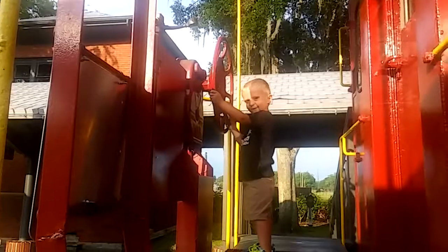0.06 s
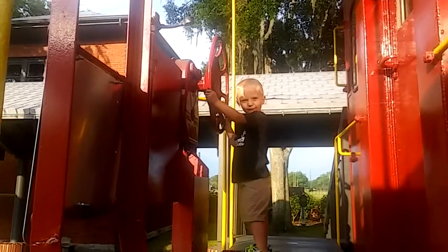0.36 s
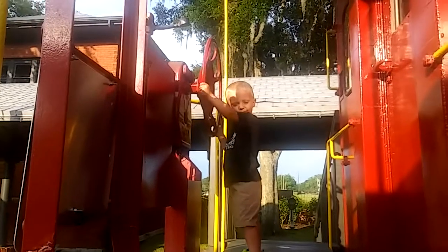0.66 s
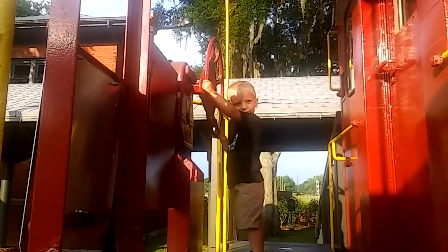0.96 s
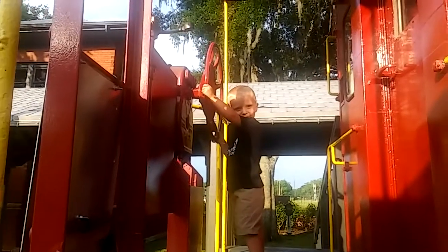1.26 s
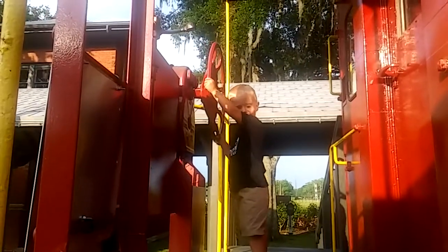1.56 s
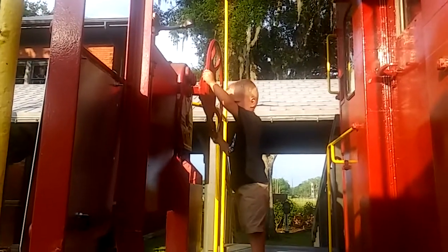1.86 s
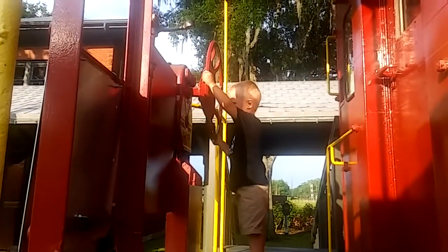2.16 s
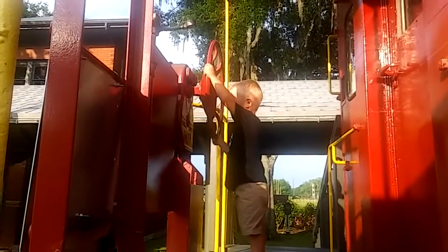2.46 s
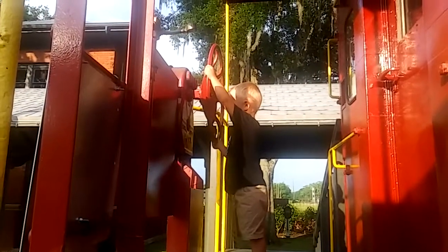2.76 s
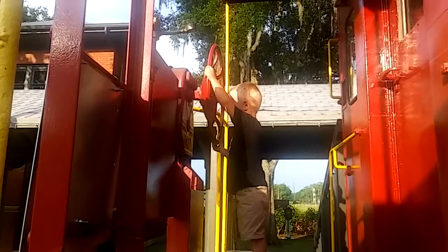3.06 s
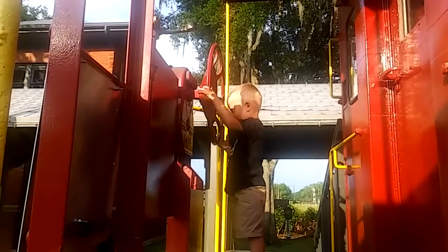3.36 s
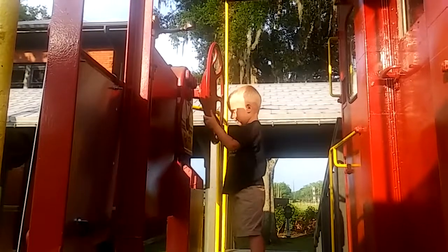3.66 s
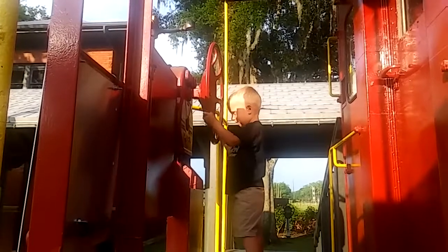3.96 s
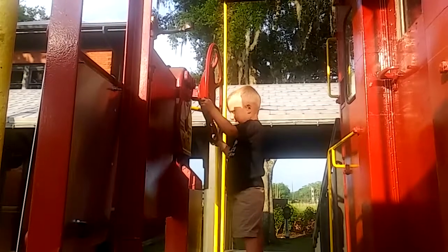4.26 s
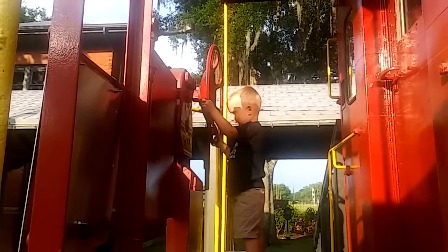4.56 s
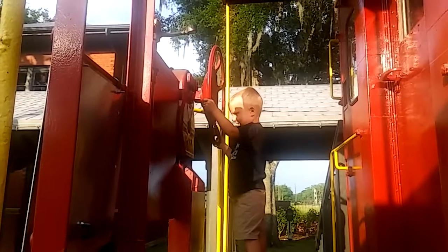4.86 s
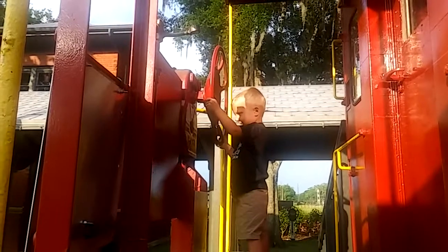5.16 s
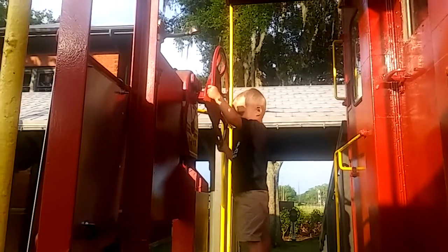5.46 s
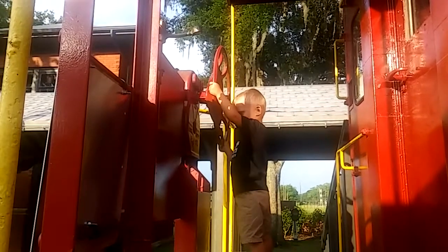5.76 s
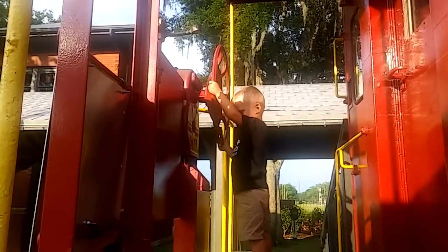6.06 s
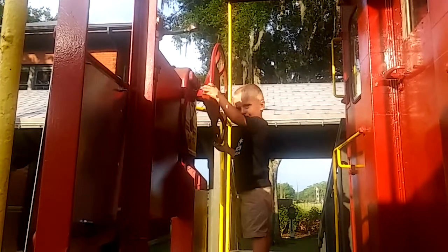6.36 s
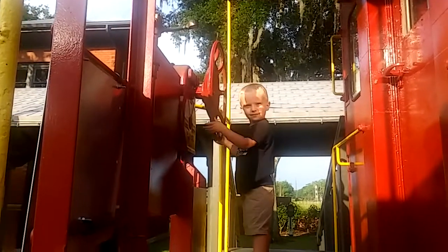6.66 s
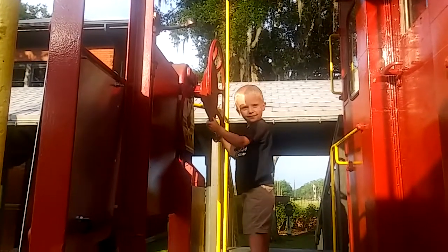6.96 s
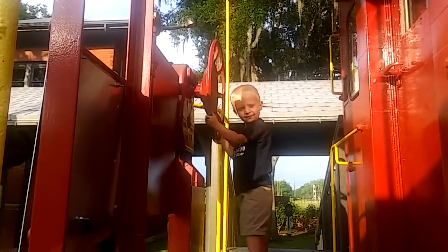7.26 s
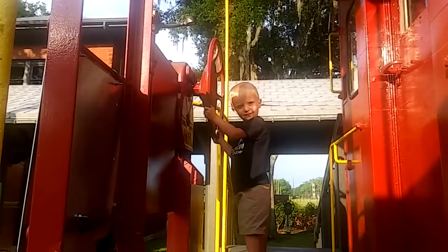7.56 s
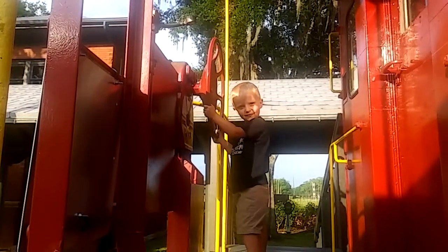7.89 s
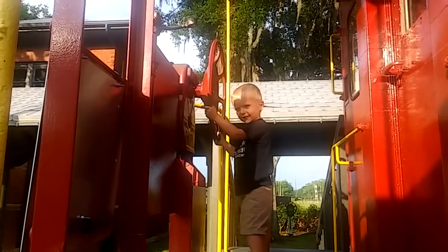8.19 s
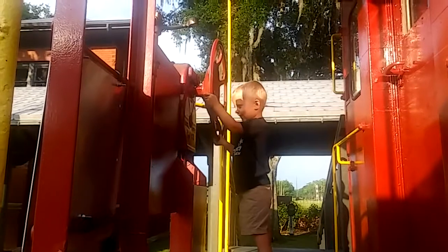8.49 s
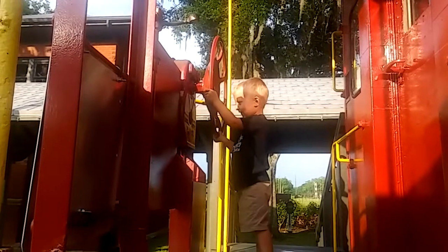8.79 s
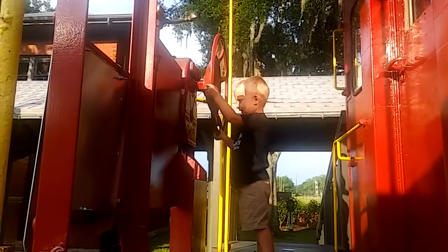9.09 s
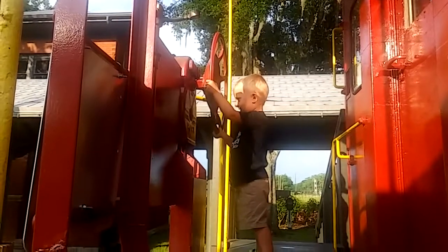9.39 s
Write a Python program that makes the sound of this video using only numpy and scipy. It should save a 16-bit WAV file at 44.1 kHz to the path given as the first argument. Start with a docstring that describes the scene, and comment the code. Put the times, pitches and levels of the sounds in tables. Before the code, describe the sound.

After half a second of silence, a faint outdoor breeze comes in and an iron hand brake wheel on a railcar is slowly cranked nearby. Its ratchet drops with sharp, bright clanks that ring briefly through the steel body, at about 0.8, 1.7 and 2.6 seconds, with light ticks, faint creaks and dry rubbing between them. After a pause, two quick clanks land at 4.2 and 4.3 seconds with a short, piercing squeal between them. A weaker squeal leads into another pair at 5.5 and 5.8 seconds. Soft, dull bumps come from about 5.6 to 8.3 seconds. A faint creak precedes a single clank at 7.5 seconds, and a last pair follows at 8.5 and 8.7 seconds. The clanks are all about equally loud and stand far above the breeze, which continues to the end at around 9.5 seconds.

```python
"""The iron hand brake wheel of a caboose, cranked slowly by a child on the open end platform.
The pawl ticks along the ratchet and drops off the teeth, clanking through the gear case and the steel
car body. The dry shaft rubs and creaks, and the wheel squeals as the iron sticks and slips.
Underneath sit soft knocks, dull bumps, faint whines and a thin buzz, on a bed of light breeze
and outdoor hush."""
import sys
import numpy as np
from scipy import signal
from scipy.fft import rfft, irfft
from scipy.io import wavfile
from scipy.ndimage import uniform_filter1d, map_coordinates

SR = 44100
rng = np.random.default_rng(int(sys.argv[2]) if len(sys.argv) > 2 else 0)


def put_to_file(sound):
    """Save the sound as 16-bit audio at rate SR, in the file named by the first command-line argument."""
    columns = np.atleast_2d(sound).T  # one column per channel
    safe = np.clip(columns, -1, 1)
    whole_steps = np.round(safe * 32767)
    wavfile.write(sys.argv[1], SR, whole_steps.astype(np.int16))


N = 420273
TIME = np.arange(N) / SR
RING_TIME = TIME[:int(1.3 * SR)]

# rise and fall of the breeze: (time [s], level [dB])
BREEZE_LEVEL = [(0.6, -49.5), (1.4, -59.5), (3.3, -64.5), (5.2, -59.5), (5.7, -57), (7.2, -52), (8.2, -47),
                (9.15, -59.5), (9.5, -50)]
# low rumble of the breeze: (frequency [Hz], relative density [dB])
BREEZE_COLOUR = [(15, -48), (25, -22.5), (62, -5), (92, -0.5), (151, 1), (273, -10.5), (300, -17.5),
                 (390, -44), (660, -120)]
# distant hush: (frequency [Hz], relative density [dB])
HUSH_COLOUR = [(200, -3), (420, -9.5), (850, -7.5), (1300, -16.5), (2100, -20.5), (2900, -25)]
# rise and fall of the high hiss: (time [s], level [dB])
HISS_LEVEL = [(.5, -69), (2.2, -66), (4.55, -67), (4.95, -75), (5.4, -77.5), (6.4, -64.5), (8.8, -67.5),
              (9.53, -71)]
# high hiss: (frequency [Hz], relative density [dB])
HISS_COLOUR = [(1470, -40), (2500, -7), (2910, -10), (4470, -9), (4750, -5), (5160, -14), (7510, -2),
               (9730, -10), (15500, -5.5)]
# spells of dry rubbing as the wheel turns: (start [s], length [s], level [dB])
RUBS = [(.2, 1.52, -57.5), (2.348, 1.05, -62), (5.56, .17, -39), (8.126, 0.42, -59), (8.704, 0.95, -66)]
# rasp of rusty iron: (frequency [Hz], relative density [dB])
RUB_COLOUR = [(1000, -18.5), (2200, 1.5), (3200, -8.5), (4400, -0.5), (5800, -6), (7800, 1.5), (10000, -13),
              (12500, -5.5), (15500, -16)]
# faint, nearly pure tones: (start [s], length [s], pitch [Hz], level [dB], glide [octaves/s])
WHINES = [(0.297, 1.33, 100, -55.5, 0.037), (1.486, 0.15, 392, -53.5, 0.22),
          (2.385, .12, 1516, -58.5, 0.011), (2.59, 0.18, 942, -39, -0.066), (4.4, 0.6, 774, -51, 0.2),
          (4.972, .22, 385, -56, -0.17), (7.431, 0.15, 1436, -45.5, -0.95),
          (8.33, 0.36, 162.5, -49, -0.099), (9.33, 0.34, 169.5, -49, 0.24)]
# partials of a whine: {multiple of the pitch: level [dB]}
WHINE_PARTIALS = {1: 0, 2: -16.5}
# creaks of the shaft: (start [s], length [s], pitch [Hz], level [dB], brightness [dB/octave])
CREAKS = [(.624, .205, 913.7, -43.5, 6), (7.312, 0.16, 904.6, -43, -8.5)]
# partials of a creak: {multiple of the pitch: level [dB]}
CREAK_PARTIALS = {1: 0, 2: 0, 3: -15.5, 4: -24.5, 5: -35}
# spells of thin buzz: (start [s], end [s])
BUZZES = [(.66, 0.98), (3.54, 3.63), (6.3, 7.52)]
# partials of the buzz: {multiple of the pitch: level [dB]}
BUZZ_PARTIALS = {2: -70.5, 3: -75.5, 4: -77, 5: -80.5, 9: -82.5, 11: -76, 13: -68, 14: -71, 15: -67}
# the pawl riding the teeth: (time [s], level [dB])
TICKS = [(0.756, -40), (0.7766, -37.5), (1.1482, -44), (1.283, -37), (1.4239, -39.5), (2.4298, -37.5),
         (2.8984, -38), (3.2944, -48), (3.7986, -52.5), (3.962, -41), (4.028, -40.5)]
# bright ring of a tick: (frequency [Hz], density [dB], t60 [s])
TICK_RING = [(295.8, -49, 0.16), (1520, -49.5, 0.21), (3072, -57.5, 0.084), (4960, -54.5, .08),
             (7760, -46, 0.071), (15000, -67.5, .07)]
# pawl drops: (time [s], force [dB], brightness [dB/octave], car body [dB], bark [dB], panel modes [dB])
CLANKS = [(.836, -1.5, 0, 3, 1, 2.5), (1.735, -2, 1, 2, 0, -1.5), (2.566, -0.5, 0, 1, -1, -6),
          (4.176, -1, 0.5, 1, 1.5, -2), (4.327, -1.5, 0.5, 3.5, -2, 0), (5.481, -1, 1, 3.5, 1.5, 5),
          (5.775, -1, 1, 0.5, -6.5, 4), (7.515, -1, 0.5, 2, 0.5, 1), (8.479, -1.5, 1, 3, 1, 2),
          (8.736, -1.5, 0.5, 3.5, -2.5, -3.5)]
# strong modes of wheel, ratchet and case: {frequency [Hz]: (level [dB], t60 [s])}
IRON_MODES = {309: (-37, .7), 368: (-31, 1.0), 444: (-37, .7), 589: (-36, .6), 826: (-33, .6),
              888: (-33, .6), 960: (-32, .6), 1087: (-32, .55), 1257: (-26, .55), 1448: (-27, .45),
              1717: (-21, .36), 1763: (-24, .3), 1839: (-21, .26), 2058: (-20, .28), 2191: (-19, .28),
              2251: (-24, .38), 2434: (-22, .36), 2632: (-25, .33), 2726: (-24, .36), 3184: (-24, .28),
              3657: (-21, .24), 3760: (-20, .2), 3827: (-17, .22), 4123: (-20, .24), 4259: (-21, .22),
              5016: (-23, .28), 5663: (-23, .19), 6971: (-22, .26), 9956: (-34, .26), 13576: (-38, .24)}
# crowd of weaker modes in the gear case: (frequency [Hz], density [dB], t60 [s])
CASE_RING = [(40, -81, .3), (300, -70.5, .35), (660, -54.5, 0.27), (1417, -47.5, 0.48), (1990, -39.5, 0.29),
             (3010, -47, .25), (3850, -40.5, .25), (5120, -43.5, 0.14), (5230, -49.5, .22),
             (7143, -41.5, 0.16), (8740, -51.5, 0.15), (12300, -59, .2), (13600, -57.5, .19),
             (15500, -64.5, 0.13)]
# the pawl's own short bark: (frequency [Hz], level [dB], t60 [s])
PAWL_MODES = [(1813, -9, 0.025), (2066, -7, .04), (6874, -12, 0.12)]
# long tail of the car body and platform roof: (frequency [Hz], density [dB], t60 [s])
BODY_RING = [(50, -79.5, 1.2), (125, -69, 1.3), (334, -59, 0.87), (720, -60.5, 1), (1100, -60.5, 0.65),
             (2280, -62, .7), (3100, -68, 0.23), (4030, -66, 0.6), (7400, -64, 0.41), (10000, -75, 0.45),
             (15500, -91, 0.49)]
# play in the gearing: (time [s], level [dB])
KNOCKS = [(1.283, -62), (2.428, -51.5), (2.896, -40.5), (3.27, -53.5), (6.262, -55)]
# soft ring of a knock: (frequency [Hz], density [dB], t60 [s])
KNOCK_RING = [(151.1, -40, 0.19), (450, -28.5, 0.064), (1000, -34, .17), (2196, -44.5, 0.1),
              (4000, -52, .1), (12000, -79, .1)]
# high squeals of the wheel: (start [s], length [s], level [dB])
SQUEALS = [(1.598, 0.12, -52), (2.462, 0.071, -47), (4.241, 0.07, -12.5), (5.348, .14, -24.5),
           (8.386, 0.064, -57.5)]
# harmonics of a squeal and a neighbouring wheel mode: {multiple of the pitch: level [dB]}
SQUEAL_PARTIALS = {1: 0, 1.076: -13.5, 2: -22.5, 3: -41.5}
# faint puffs of noise just before some clanks: (start [s], length [s], level [dB])
LEAD_INS = [(2.549, 0.018, -39.5), (5.464, .018, -40.5), (5.755, 0.019, -42.5), (7.497, 0.0221, -45),
            (8.464, .016, -43)]
# dull colour of a puff: (frequency [Hz], relative density [dB])
LEAD_IN_COLOUR = [(1000, -1), (2000, -3.5), (3000, -10.5), (5000, -22)]
# dull bumps: (time [s], level [dB])
BUMPS = [(3.864, -41), (5.629, -30), (5.902, -28.5), (6.043, -36), (6.264, -23), (6.437, -35.5),
         (6.473, -31), (6.524, -32.5), (6.774, -31), (7.268, -29.5), (8.124, -33.5), (8.25, -30)]
# low thud of a bump: (frequency [Hz], density [dB], t60 [s])
BUMP_RING = [(40, -51, 0.22), (85.3, -20.5, 0.092), (177, -20.5, 0.085), (314, -46, 0.21),
             (900, -57, 0.119), (3100, -102, .1)]


def from_db(db):
    """Decibels to gain."""
    return 10 ** (np.asarray(db) / 20)


def rms_one(x):
    """Scale to unit power."""
    return x / np.sqrt(np.mean(x ** 2) + 1e-20)


def in_time(curve):
    """A level curve at every sample."""
    return np.interp(TIME, *np.transpose(curve))


def at_hz(rows, hz):
    """The columns of a spectrum at given frequencies."""
    points, *columns = np.transpose(rows)
    return [np.interp(np.log(hz + 1), np.log(points), c) for c in columns]


def drift(rate_hz):
    """Smooth random modulation with a spread of about one."""
    return map_coordinates(rng.standard_normal(N // 20), [TIME * rate_hz], order=3, mode="wrap")


def noise(colour):
    """Coloured noise at unit power, rolled off past the ends of its spectrum."""
    hz = np.fft.rfftfreq(N, 1 / SR) + 1
    skirts = 1 / np.sqrt((1 + (colour[0][0] / hz) ** 8) * (1 + (hz / colour[-1][0]) ** 8))
    return rms_one(irfft(rfft(rng.standard_normal(N)) * from_db(at_hz(colour, hz)[0]) * skirts, N))


def add(track, start_s, sound):
    """Mix a sound in at a given time."""
    i = max(round(start_s * SR), 0)
    track[i:i + len(sound)] += sound[:N - i]


def attack(t, rise_s):
    """An envelope that eases up to full level."""
    return 1 - np.exp(-t / rise_s)


def decay(t, t60):
    """An envelope that falls 60 dB in t60 seconds."""
    return np.exp(-np.log(1000) * t / t60)


def swell(start_s, length_s, crest, power):
    """A stroke's samples and envelope: it peaks at the fraction crest, flatter for a low power."""
    on = (TIME > start_s) & (TIME < start_s + length_s)
    progress = (TIME[on] - start_s) / length_s
    skewed = progress ** (np.log(.5) / np.log(crest))
    return on, abs(np.sin(np.pi * skewed)) ** power


def outdoors(gust_db=3, waver_db=.9, hush_db=-56, hum_db=-64, hum_hz=396, hum_width_hz=12):
    """A lumpy breeze; a distant hush and a narrow hum rise and fall with it, under a thin hiss."""
    wind_db = in_time(BREEZE_LEVEL)
    swing_db = wind_db - wind_db.mean()
    breeze = from_db(wind_db + gust_db * drift(14)) * noise(BREEZE_COLOUR)
    opening_db = in_time([(.71, 7), (1.11, 0)])   # the hush starts louder, then settles
    hush = from_db(hush_db + .25 * swing_db + opening_db + waver_db * drift(12)) * noise(HUSH_COLOUR)
    resonance = signal.iirpeak(hum_hz, hum_hz / hum_width_hz, fs=SR)   # likely a car body panel
    hum = from_db(hum_db + .64 * swing_db) * rms_one(signal.lfilter(*resonance, rng.standard_normal(N)))
    hiss = from_db(in_time(HISS_LEVEL)) * noise(HISS_COLOUR)
    return breeze + hush + hum + hiss


def grainy_swells(strokes, colour, grain_db, grain_hz, crest, power):
    """Noise with an uneven grain, swelling and fading with each stroke."""
    envelope = np.zeros(N)
    for start_s, length_s, level_db in strokes:
        on, arch = swell(start_s, length_s, crest, power)
        envelope[on] += from_db(level_db) * arch
    return envelope * from_db(grain_db * drift(grain_hz)) * noise(colour)


def rubbing():
    """Rusty faces rasp against each other as the wheel turns."""
    return grainy_swells(RUBS, RUB_COLOUR, grain_db=2.5, grain_hz=160, crest=.36, power=.93)


def stick_slip(strokes, partials, jitter, wander, flutter_db, crest, power):
    """Dry iron sticks and slips: a tone that swells and fades, unsteady in pitch and level."""
    out = np.zeros(N)
    wobble = jitter * drift(500) + wander * drift(35)
    flutter = drift(90)
    for start_s, length_s, hz, level_db, glide, tilt_db in strokes:
        on, arch = swell(start_s, length_s, crest, power)
        pitch = hz * 2 ** (glide * (TIME[on] - start_s - length_s / 2)) * (1 + wobble[on])
        phase = 2 * np.pi * np.cumsum(pitch) / SR
        tone = sum(from_db(db + tilt_db * np.log2(k)) * arch ** np.log2(np.sqrt(k)) * np.sin(k * phase)
                   for k, db in partials.items())   # overtones grow as the grip tightens
        out[on] += np.sqrt(2) * tone * from_db(level_db + flutter_db * flutter[on]) * arch
    return out


def whines():
    """Faint smooth tones fade in, hold and fade out."""
    strokes = [(*row, 0) for row in WHINES]
    return stick_slip(strokes, WHINE_PARTIALS, jitter=.006, wander=.002, flutter_db=1.5,
                      crest=.5, power=.45)


def shaft_creaks():
    """The shaft catches at once and holds a rough note until just before the pawl drops."""
    strokes = [(start_s, length_s, hz, db, 0, tilt_db) for start_s, length_s, hz, db, tilt_db in CREAKS]
    return stick_slip(strokes, CREAK_PARTIALS, jitter=.02, wander=.008, flutter_db=3.5,
                      crest=.42, power=.55)


def platform_reverb(x, wet_db=-9.5, t60=.33):
    """Scattered reflections between the steel walls of the end platform."""
    echoes = rng.standard_normal(len(RING_TIME)) * decay(RING_TIME, t60)
    return x + from_db(wet_db) * signal.fftconvolve(x, echoes / np.linalg.norm(echoes))[:N]


def thin_buzz(pitch_hz=1000):
    """A tiny motor whirrs very faintly in spells, all high harmonics of one steady pitch."""
    gate = sum((TIME > start) & (TIME < end) for start, end in BUZZES)
    buzz = sum(from_db(db) * np.sin(2 * np.pi * k * pitch_hz * TIME) for k, db in BUZZ_PARTIALS.items())
    return np.sqrt(2) * buzz * uniform_filter1d(gate.astype(float), size=400)


def dense_ring(ring, white):
    """Modes too close to tell apart: overlapping octaves of noise, each dying at its own rate."""
    size = len(white)
    hz = np.fft.rfftfreq(size, 1 / SR) + 1
    spectrum = rfft(white) * from_db(at_hz(ring, hz)[0]) * np.sqrt(SR / 2)
    out = np.zeros(size)
    for centre_hz in 2. ** np.arange(5, 15):
        band = np.maximum(1 - abs(np.log2(hz / centre_hz)), 0)
        out += irfft(spectrum * band, size) * decay(TIME[:size], t60=at_hz(ring, centre_hz)[1])
    return out


def taps(hits, ring, attack_s, crack_db=0, crack_s=.003):
    """Small contacts: a brief crack on the front of a short ring."""
    out, t = np.zeros(N), TIME[:SR // 3]
    envelope = attack(t, attack_s) * (1 + from_db(crack_db) * np.exp(-t / crack_s))
    for start_s, level_db in hits:
        add(out, start_s, from_db(level_db) * dense_ring(ring, rng.standard_normal(len(t))) * envelope)
    return out


def pawl_ticks():
    """The pawl rides the teeth with light, crisp ticks."""
    return taps(TICKS, TICK_RING, attack_s=.0003, crack_db=-6)


def peaky(white, ripple_db=3, spacing_hz=45):
    """Each blow favours some of the close-set modes and misses others."""
    hz = np.fft.rfftfreq(len(white), 1 / SR)
    ripple = np.interp(hz / spacing_hz, np.arange(len(hz)), rng.standard_normal(len(hz)))
    return irfft(rfft(white) * rms_one(from_db(ripple_db * ripple)), len(white))


def struck(modes, scatter_db=3):
    """Struck modes ring as decaying sines, each with a random strength and phase."""
    hz, level_db, t60 = np.transpose(modes)[:, :, None]
    strength = from_db(level_db + scatter_db * rng.standard_normal(hz.shape))
    phase = 2 * np.pi * (hz * RING_TIME + rng.random(hz.shape))
    return np.sum(strength * decay(RING_TIME, t60) * np.sin(phase), axis=0)


def tilted(x, db_per_octave, pivot_hz=3000):
    """Tilt the spectrum: a harder contact is brighter."""
    hz = np.fft.rfftfreq(len(x), 1 / SR)
    return irfft(rfft(x) * from_db(db_per_octave * np.log2(np.maximum(hz / pivot_hz, .1))), len(x))


def pawl_clanks(slip_db=-16, slip_s=.005, alike=.52, panel_top_hz=500):
    """The pawl slips off a tooth and slams home; the case rings at once, the car body a moment later."""
    out, t = np.zeros(N), RING_TIME
    shared = rng.standard_normal((2, len(t)))   # the same iron, struck at a slightly new spot each time
    for start_s, force_db, bright_db, body_db, bark_db, panel_db in CLANKS:
        fresh = rng.standard_normal(shared.shape)
        case_noise, body_noise = np.sqrt(alike) * shared + np.sqrt(1 - alike) * fresh
        case = dense_ring(CASE_RING, peaky(case_noise))
        bark = from_db(bark_db) * struck(PAWL_MODES)
        impact = (case + bark) * attack(t, .0006)
        modes = [(hz, db + panel_db * (hz < panel_top_hz), t60) for hz, (db, t60) in IRON_MODES.items()]
        iron = tilted(impact + struck(modes) * attack(t, .0025), bright_db)
        body = from_db(body_db) * dense_ring(BODY_RING, body_noise) * attack(t, .0083)
        slip = tilted(impact, db_per_octave=-5.5) * t / slip_s * (t < slip_s)   # dull ramp into the hit
        add(out, start_s, from_db(force_db) * (iron + body))
        add(out, start_s - slip_s, from_db(force_db + slip_db) * slip)
    return out


def gear_knocks():
    """Play in the gearing is taken up with a soft knock."""
    return taps(KNOCKS, KNOCK_RING, attack_s=.0014)


def wheel_squeals(pitch_hz=3842):
    """Friction locks onto one mode of the wheel, builds up and lets go."""
    strokes = [(start_s, length_s, pitch_hz, db, 0, 0) for start_s, length_s, db in SQUEALS]
    return stick_slip(strokes, SQUEAL_PARTIALS, jitter=.005, wander=.002, flutter_db=2.8,
                      crest=.62, power=1.3)


def clank_lead_ins():
    """A faint, dull puff of noise just before some clanks."""
    return grainy_swells(LEAD_INS, LEAD_IN_COLOUR, grain_db=3, grain_hz=400, crest=.23, power=.28)


def low_bumps():
    """Dull, bassy thuds with a rounded attack."""
    return taps(BUMPS, BUMP_RING, attack_s=.0066)


def scene():
    """The brake and the air around it, in mono; the squeals and creaks get the platform's reverb."""
    contacts = pawl_ticks() + gear_knocks() + low_bumps() + pawl_clanks()
    friction = platform_reverb(wheel_squeals() + shaft_creaks()) + rubbing()
    return (contacts + friction + clank_lead_ins() + whines() + outdoors() + thin_buzz())[None]


def record(dry, start_s=.505, fade_s=.0029, ceiling=1.06, low_cut_hz=42, high_cut_hz=15800):
    """Open after half a second of silence, soft-clip the peaks, trim the deep bass and the very top."""
    gated = dry * np.clip((TIME - start_s) / fade_s, 0, 1)
    squashed = gated / (1 + (gated / ceiling) ** 4) ** (1 / 4)
    thinned = signal.sosfilt(signal.butter(2, low_cut_hz, "high", fs=SR, output="sos"), squashed)
    return signal.sosfilt(signal.ellip(10, .1, 80, high_cut_hz, fs=SR, output="sos"), thinned)


dry = scene()
out = record(dry)
put_to_file(out)
```